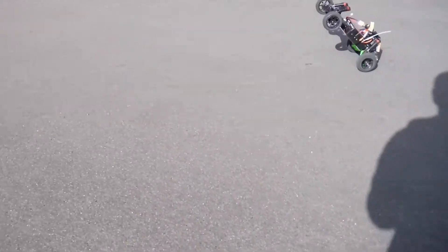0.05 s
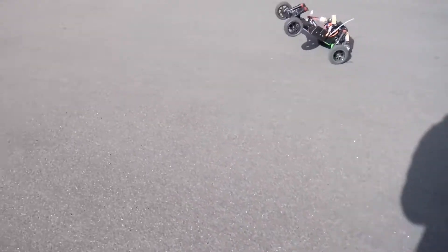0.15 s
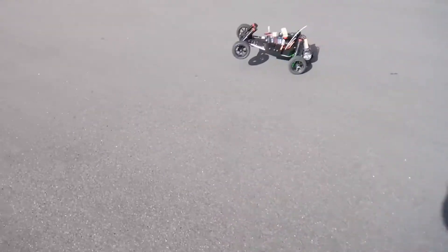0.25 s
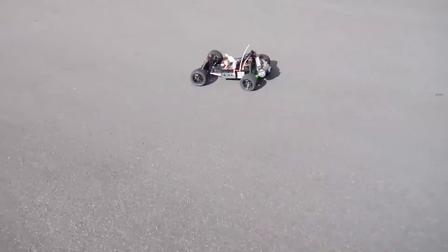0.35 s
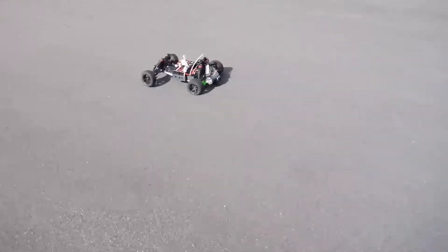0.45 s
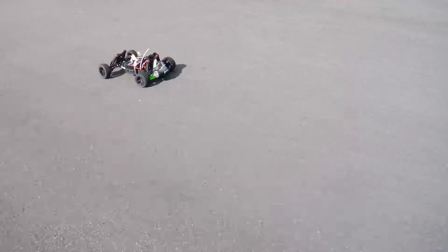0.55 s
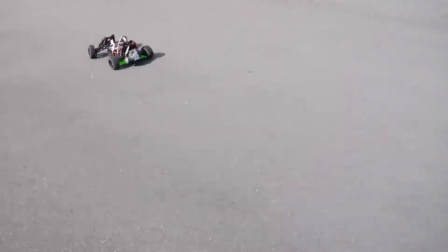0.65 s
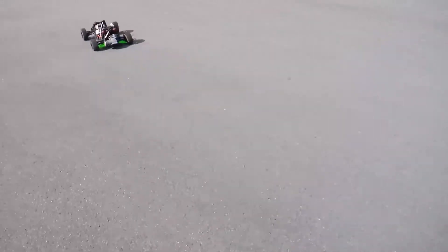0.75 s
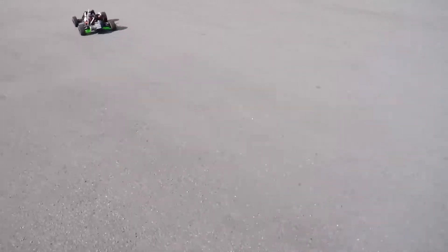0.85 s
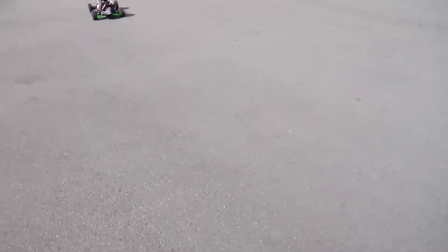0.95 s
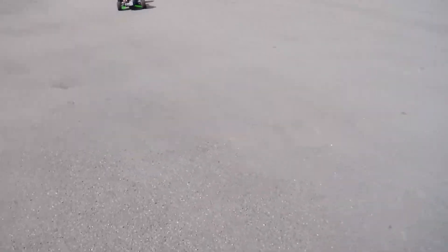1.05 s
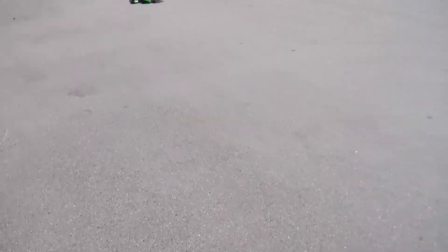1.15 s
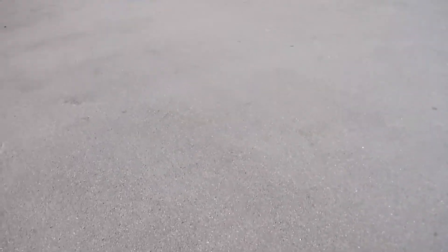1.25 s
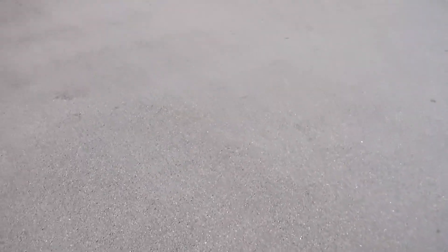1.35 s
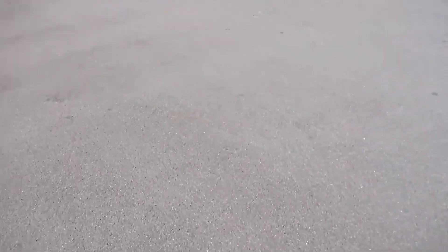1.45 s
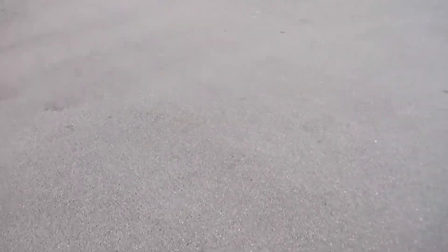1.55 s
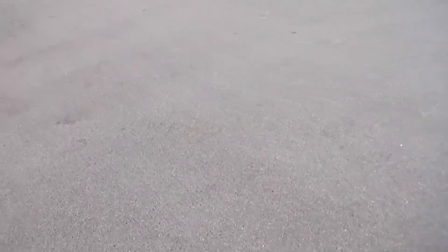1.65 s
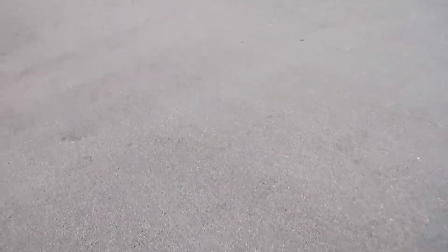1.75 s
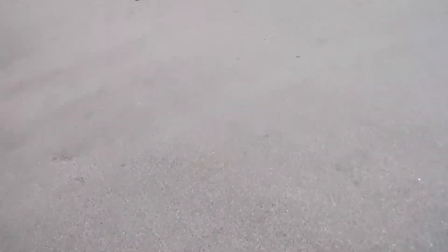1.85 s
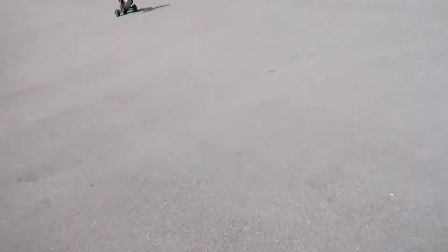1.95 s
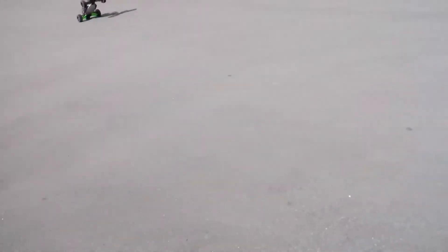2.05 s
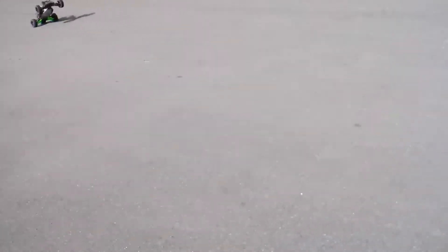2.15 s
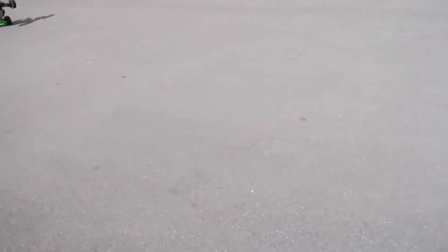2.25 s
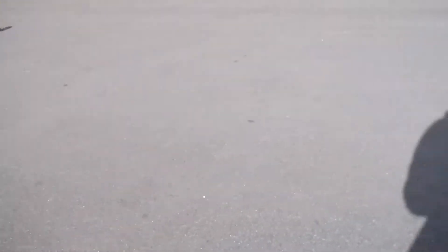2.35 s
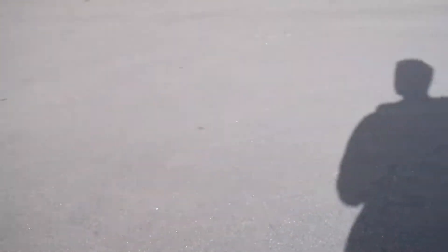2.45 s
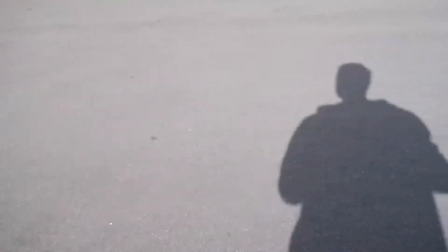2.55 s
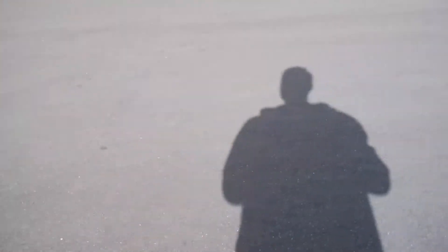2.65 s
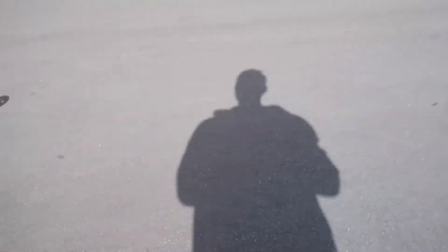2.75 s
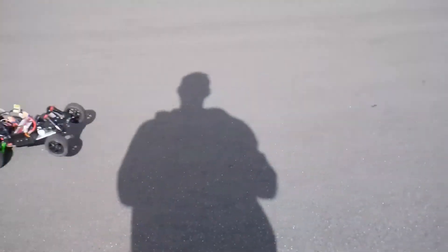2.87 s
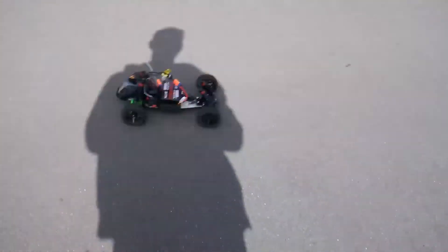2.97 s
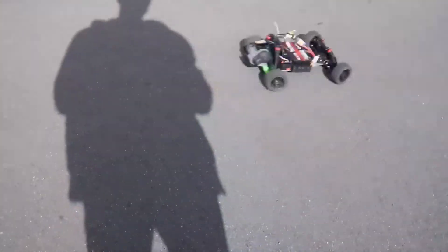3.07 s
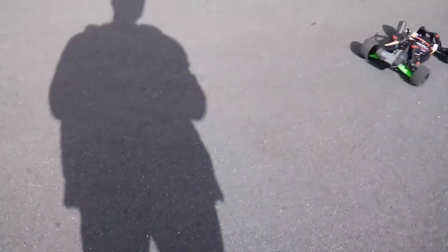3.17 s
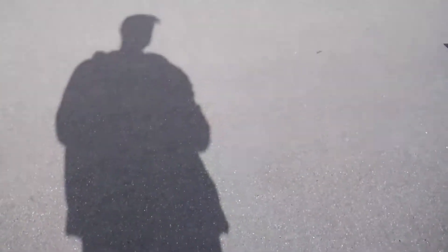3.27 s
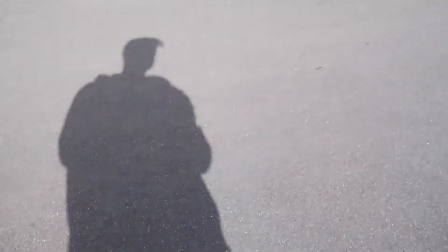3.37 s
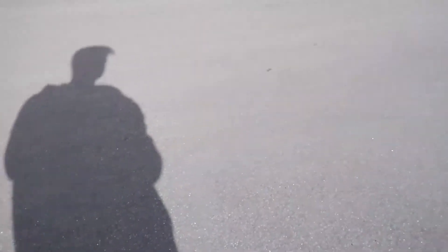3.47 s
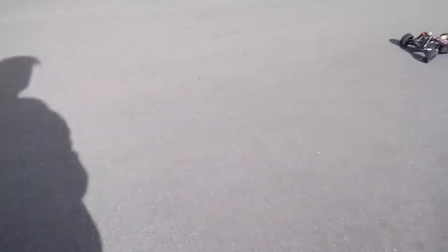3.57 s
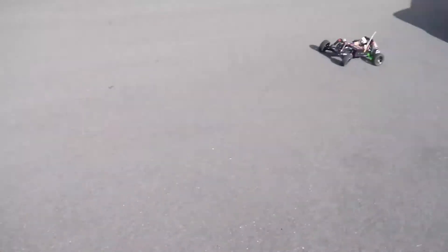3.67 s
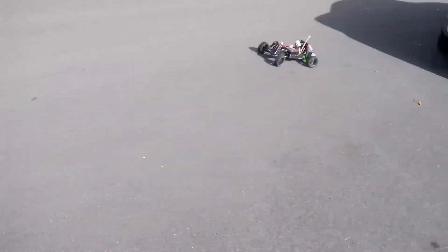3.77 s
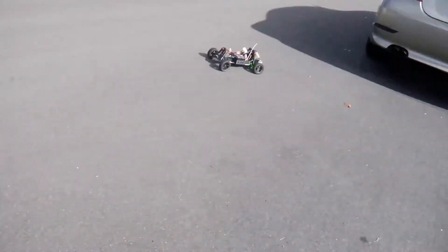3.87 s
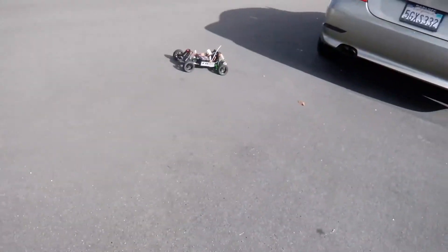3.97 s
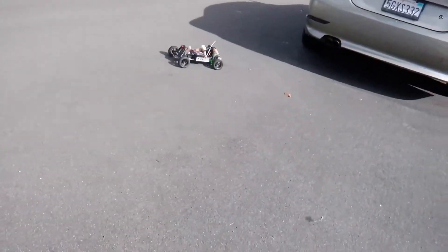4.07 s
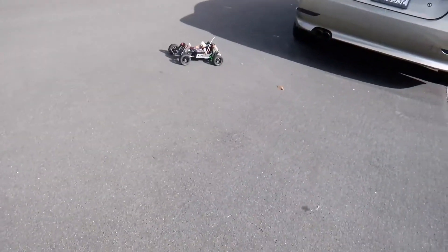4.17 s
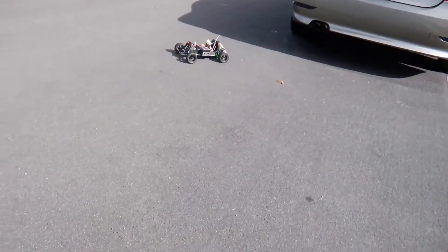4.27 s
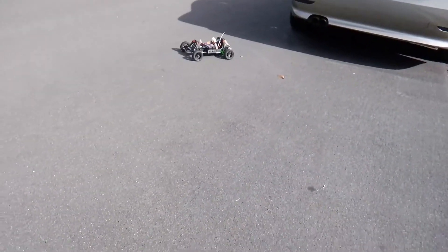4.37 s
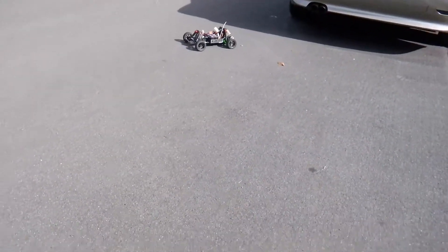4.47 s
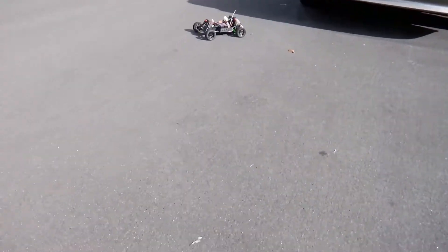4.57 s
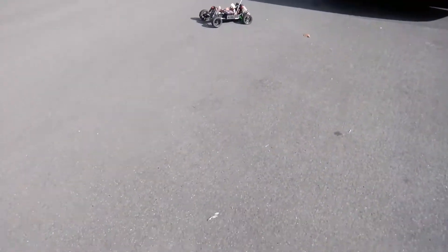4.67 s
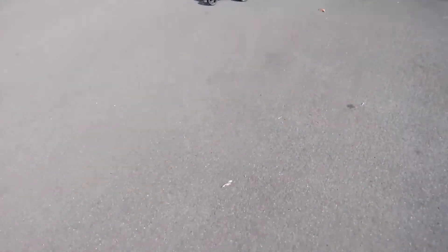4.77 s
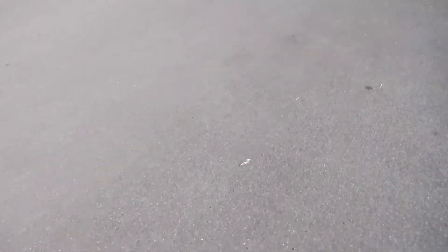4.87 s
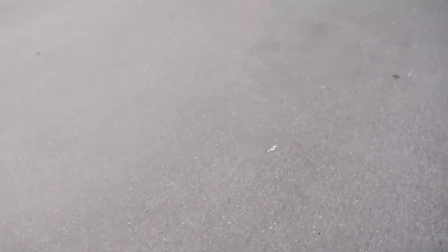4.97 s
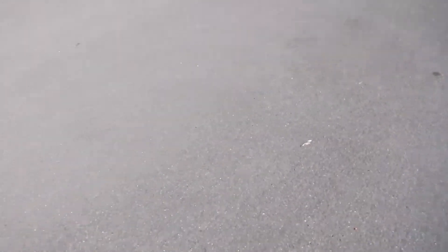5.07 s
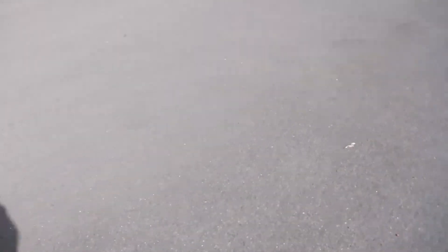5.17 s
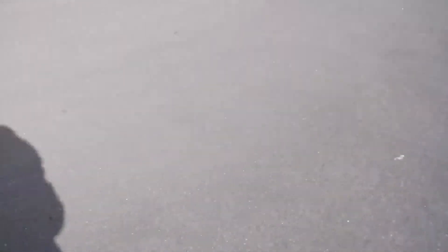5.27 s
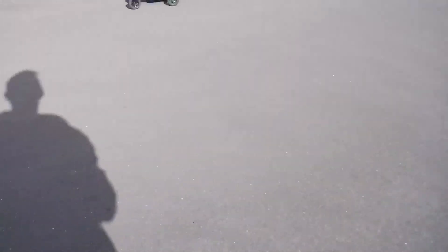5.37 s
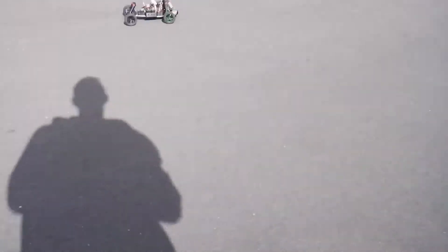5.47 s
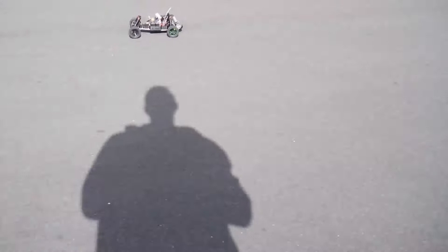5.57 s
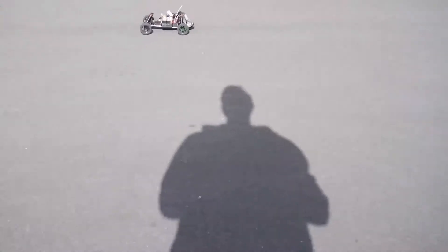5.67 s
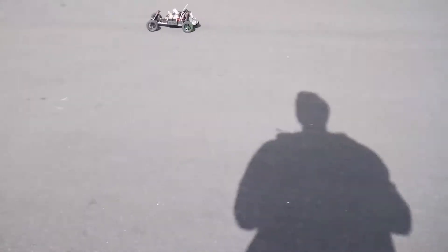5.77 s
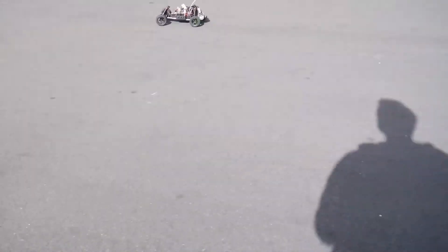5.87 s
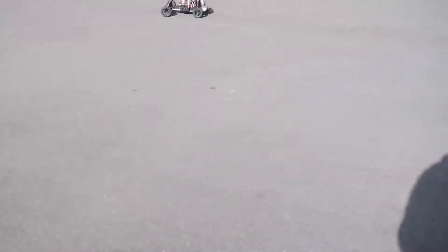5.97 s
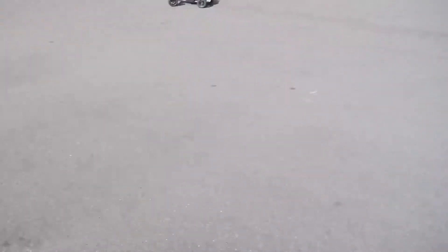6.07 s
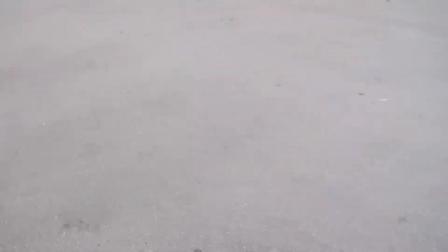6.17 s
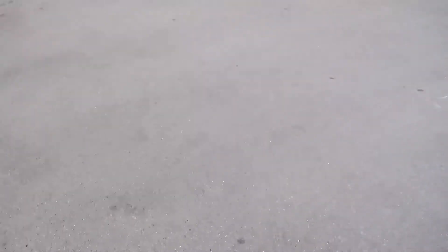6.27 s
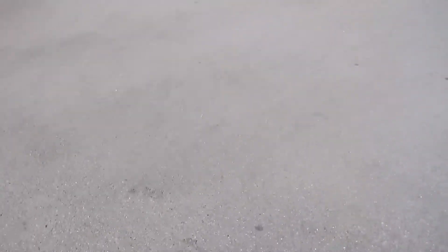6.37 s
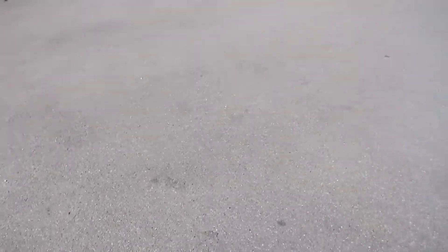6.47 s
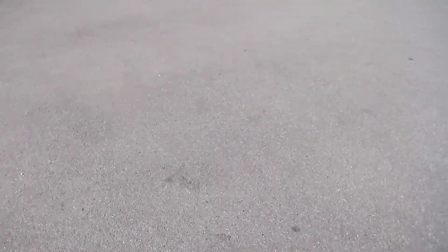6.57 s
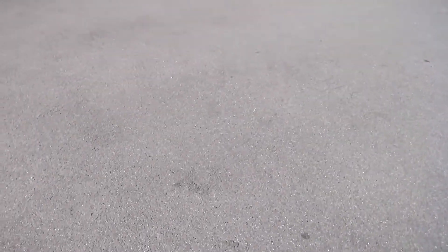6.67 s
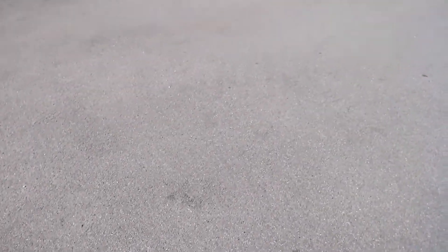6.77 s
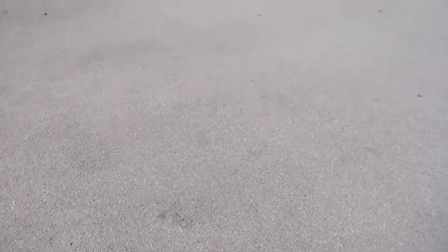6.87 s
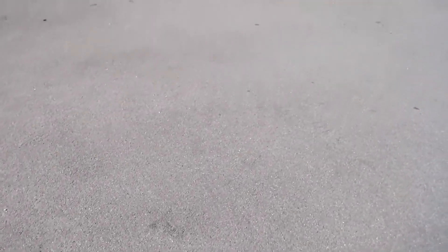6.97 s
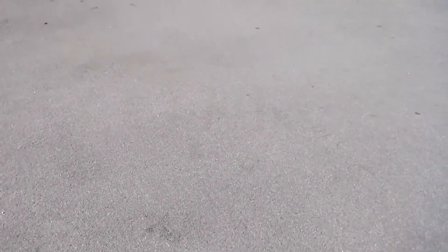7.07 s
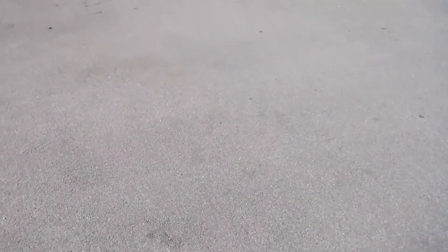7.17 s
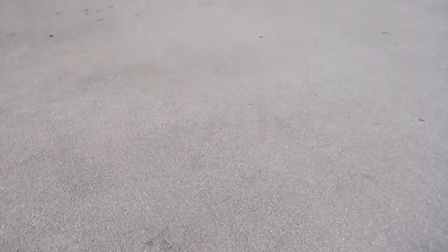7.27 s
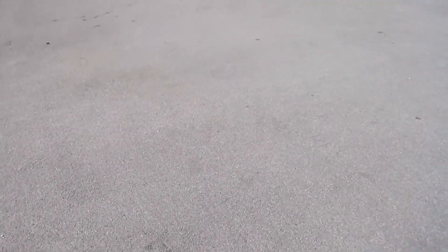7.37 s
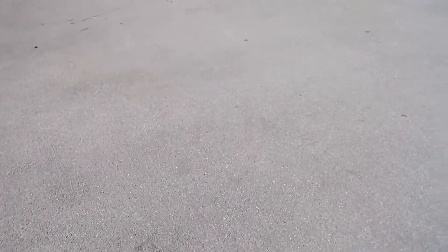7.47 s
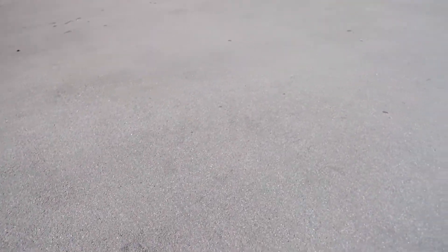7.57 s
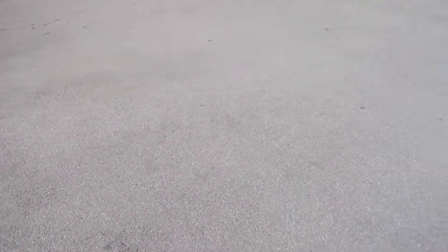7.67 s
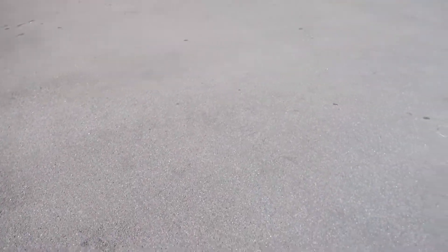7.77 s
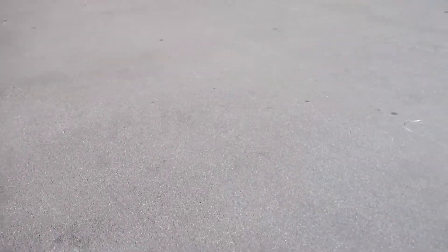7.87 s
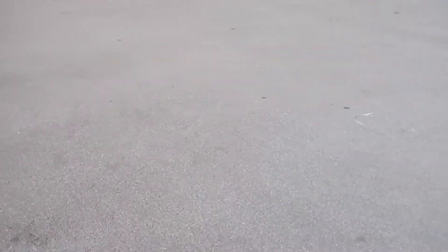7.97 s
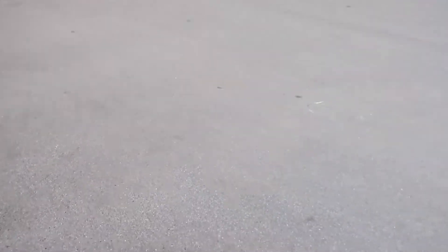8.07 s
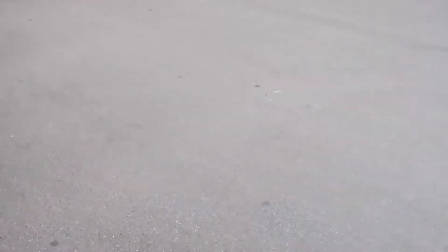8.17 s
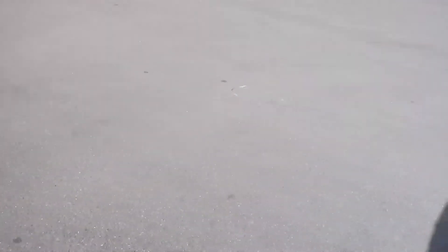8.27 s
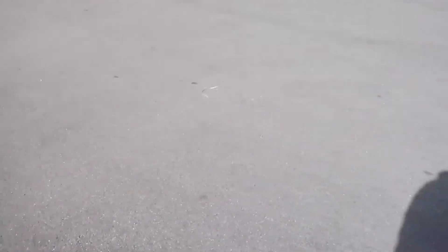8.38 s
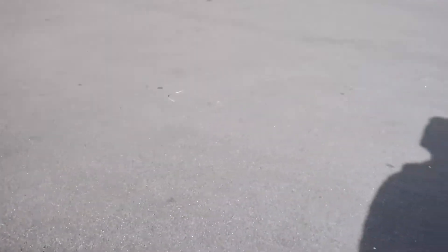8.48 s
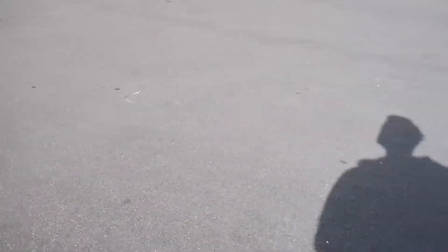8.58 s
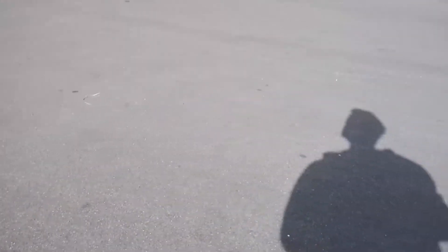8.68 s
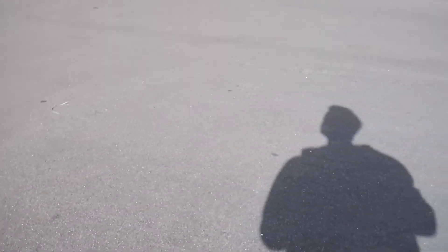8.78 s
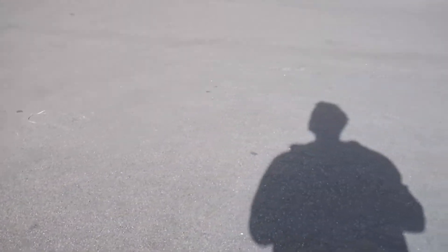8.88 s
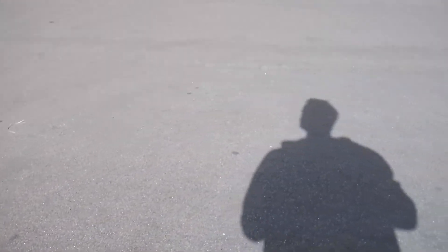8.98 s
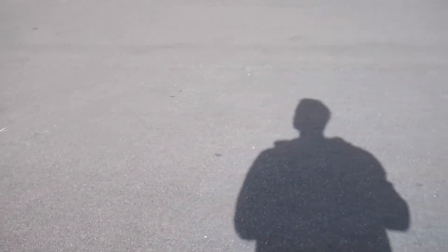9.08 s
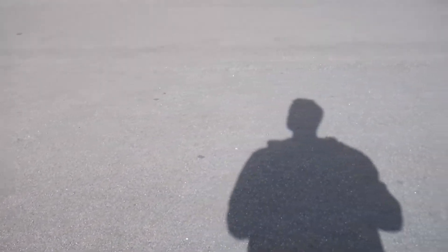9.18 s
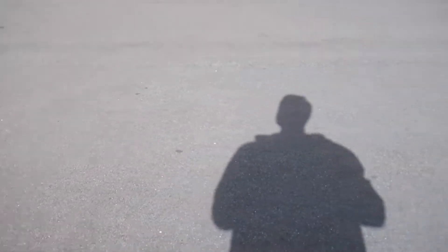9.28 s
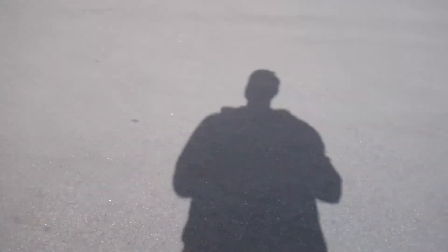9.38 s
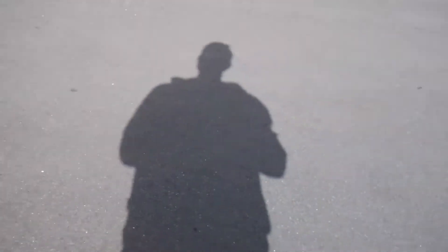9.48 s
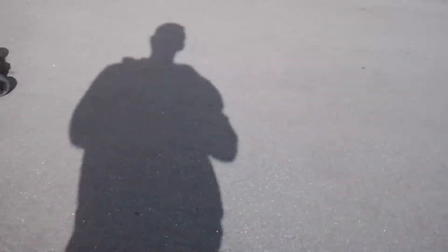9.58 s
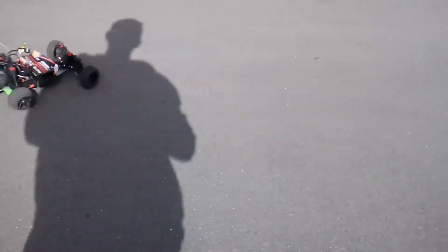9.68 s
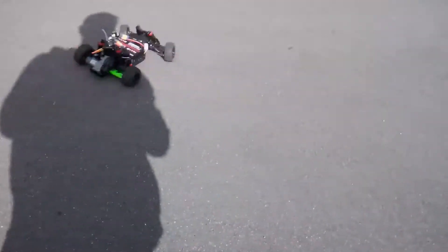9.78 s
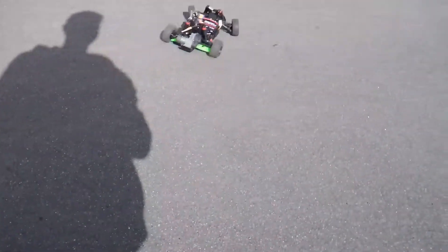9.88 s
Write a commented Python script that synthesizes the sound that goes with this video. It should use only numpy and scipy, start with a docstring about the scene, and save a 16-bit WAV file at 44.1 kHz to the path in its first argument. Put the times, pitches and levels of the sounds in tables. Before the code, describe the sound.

On a quiet street, the gears of a small radio-controlled car whine in uneven, high-pitched bursts over a plastic and metal rattle. The car knocks against the asphalt several times, eases to a crawl, then sprints up to a shrill peak and brakes. After some brief spin-ups, a longer climb in speed finishes near the microphone. Tyre noise swells as it passes and turns, while gusts add low rumbles and thumps.

```python
"""The gears of a small electric radio-controlled buggy whine as it sprints, coasts and tumbles on asphalt.
Each mesh radiates at its tooth-passing frequency, modulated by the eccentric spur gear. Impacts in the
drivetrain rattle the chassis, the tyres roar as it passes, and the frame knocks on the road.
The speed controller sings faintly, gusts buffet the microphone, and the quiet street adds a short echo."""
import sys
import numpy as np
from scipy import signal
from scipy.fft import rfft, irfft
from scipy.io import wavfile
from scipy.ndimage import uniform_filter1d

SR = 44100
rng = np.random.default_rng(int(sys.argv[2]) if len(sys.argv) > 2 else 0)


def dump_mix(stems):
    """Bounce the given channels to the path in sys.argv[1] as a 16-bit WAV at rate SR."""
    frames = np.atleast_2d(stems).T  # one column per channel
    limited = np.clip(frames, -1, 1)  # hard clip at full scale
    pcm = np.round(limited * 32767).astype(np.int16)
    wavfile.write(sys.argv[1], SR, pcm)


N = 437913

# Levels in the tables are relative: each source applies its own gain.
# Runs under throttle: t/s, spur mesh f/Hz, whine level/dB
WHEELIE_RUN = [(0.0, 9560, -42.5), (.15, 9470, -41), (.25, 3403, -27), (.28, 2779, -45),
               (.303, 2907, -19.5), (.335, 3230, -62), (.37, 5135, -26.5), (.46, 6635, -18.5),
               (.5, 4550, -44), (.56, 4970, -40), (.64, 6650, -29.5), (.75, 7570, -28.5),
               (.82, 6186, -38.5), (1.2, 6644, -55), (1.26, 5190, -62), (1.29, 3114, -23.5)]
BOUNCING_RUN = [(1.725, 3157, -25.5), (1.749, 3990, -36.5), (1.775, 3220, -27), (1.825, 3130, -29.5),
                (1.91, 3450, -27), (1.95, 4438, -62), (2.001, 6075, -34), (2.101, 7090, -50),
                (2.191, 4746, -26.5), (2.31, 7160, -40), (2.428, 5480, -35), (2.501, 6570, -31),
                (2.666, 6090, -44), (2.735, 7070, -28), (2.766, 5874, -31), (2.8, 6780, -23),
                (2.908, 6860, -30.5), (2.97, 6050, -40), (2.996, 4470, -24.5)]   # on the rear wheels
SPRINT_RUN = [(4.641, 2424, -22.5), (4.689, 2403, -30), (4.76, 2710, -25), (4.785, 3162, -28),
              (4.825, 4036, -31), (4.85, 3446, -28.5), (4.88, 3917, -31), (4.97, 3970, -31),
              (5.25, 4984, -30.5), (5.3, 5590, -25.5), (5.7, 6090, -24.5), (5.751, 6500, -22),
              (5.97, 6830, -34), (6.08, 9210, -30), (6.19, 9550, -33), (6.281, 6230, -48),
              (6.304, 3573, -31.5)]
LUNGE_RUN = [(6.773, 3221, -33), (6.885, 3764, -30)]
RETURN_RUN = [(7.705, 3210, -26), (7.78, 2987, -33.5), (7.83, 3957, -27.5), (7.915, 4533, -31.5),
              (8.0, 3400, -31.5), (8.08, 3420, -33), (8.15, 3913, -31.5), (8.3, 4290, -30.5),
              (8.5, 4460, -32), (8.849, 5058, -37.5), (9.25, 5260, -32), (9.4, 5837, -33.5),
              (9.719, 5450, -29), (9.764, 6600, -18), (9.849, 8780, -26), (9.93, 9110, -29)]   # slow build-up, then a kick close by
# Peaks of brief spin-ups between runs: t/s, spur mesh f/Hz, whine level/dB
BLIPS = [(3.465, 4230, -30), (3.734, 1983, -41), (3.82, 1900, -35), (3.993, 2300, -35.5),
         (4.105, 1700, -38), (4.264, 1700, -39), (6.996, 2597, -36), (7.075, 2622, -40.5),
         (7.21, 2710, -42.5), (7.33, 1750, -34), (7.451, 2723, -45)]
# Strength of each mesh against speed: spur mesh f/Hz, level/dB
SPUR_RESPONSE = [(500, -37), (900, -34), (1300, -1.5), (3100, 5.5), (3600, 1), (4000, 5.5), (5100, -6),
                 (5700, -4.5), (6600, 1), (7000, -2.5), (8000, -24), (9500, -18)]
GEARBOX_RESPONSE = [(3000, -14), (3900, -11), (5000, -8.5), (6200, -3), (7000, -1.5), (9200, 0.5)]
# Radiation of overtones from the gear case: f/Hz, level/dB
SPUR_RADIATION = [(400, -14), (2500, 1), (4200, 3), (5500, -9), (6900, 6), (7600, -24), (8500, -38),
                  (10000, -8), (12000, -26), (14000, -51), (16000, -42)]
GEARBOX_RADIATION = [(1000, -8), (2400, -2), (3150, 2), (3700, -3), (4000, -6), (4350, -17), (7000, -24)]
# Chassis noise, one curve per stretch of driving: t/s, rattle level/dB, rasp level/dB
CHASSIS_LEVELS = [
    [(0.0, -19, -43.5), (0.012, -29.5, -29.5), (0.238, -25, -32), (0.288, -38.5, -51), (0.446, -25, -26.5),
     (0.54, -49, -51), (0.64, -28.5, -33), (0.852, -34, -37), (1.28, -28, -38), (1.62, -43.5, -49.5)],
    [(1.63, -38, -52), (1.668, -29.5, -43), (1.726, -24, -35), (1.732, -30, -37), (1.868, -32, -50),
     (1.944, -35.5, -44), (2.162, -24.5, -34), (2.626, -35.5, -36.5), (2.656, -36, -36), (2.68, -53, -46)],
    [(2.69, -45, -54), (2.734, -33, -43), (2.866, -35, -35), (2.972, -32, -46), (2.996, -24, -28),
     (3.004, -22.5, -31), (3.118, -34, -36), (3.478, -25, -33), (3.718, -39.5, -52), (3.78, -55, -58)],
    [(4.58, -58, -62), (4.608, -25, -44), (4.648, -25, -35.5), (4.964, -27.5, -43.5), (5.112, -27, -36.5),
     (5.826, -28, -34), (6.152, -22, -33.5), (6.284, -36, -42), (6.304, -25.5, -37), (6.35, -59, -53)],
    [(6.36, -48, -49), (6.38, -39, -43.5), (6.716, -44, -47), (6.726, -29, -44), (6.762, -34, -36),
     (6.772, -25, -32), (6.784, -28, -38), (6.866, -25, -29.5), (6.914, -23.5, -43), (6.95, -54, -54)],
    [(7.61, -73, -79), (7.62, -36, -58), (7.69, -28.5, -41.5), (8.25, -32.5, -45.5), (8.39, -32.5, -42.5),
     (8.93, -30, -45), (9.74, -27.5, -27), (9.76, -30, -30), (9.81, -26.5, -33), (9.93, -25.5, -27.5)],
]
# Modes of the frame: f/Hz, bandwidth/Hz, level/dB
FRAME_MODES = [(886, 76, 3.5), (1568, 107, 6.5), (2000, 54, 3), (2377, 200, 0.5), (3223, 147, 8.5),
               (3995, 104, 3)]
# Impacts on the road: t/s, level/dB
KNOCKS = [(0.3494, -35), (1.652, -21), (1.7752, -17), (1.9531, -12), (2.2544, -8.5), (2.3072, -6.5),
          (2.4006, -5.5), (2.4492, -6.5), (2.4931, -6), (2.534, -5.5), (2.5884, -14), (2.6414, -7),
          (2.6545, -7.5), (2.952, -13), (2.9796, -31.5), (4.6063, -12), (5.9754, -15), (6.244, -12),
          (6.306, -26), (6.6567, -16), (7.2148, -21.5), (7.2729, -28), (7.308, -20.5), (7.442, -22.5),
          (7.6243, -20)]
# Swells of noise: centre t/s, duration/s, level/dB
TYRE_SWELLS = [(.22, .08, -41), (.43, 0.081, -28.5), (.74, 0.17, -32.5), (1.37, 0.4, -25.5),
               (3.29, .5, -23), (4.67, 0.11, -29.5), (6.1, 0.39, -26), (6.61, .3, -28.5), (9.62, 0.34, -20)]   # passes, turns and scuffs under sudden throttle
GUSTS = [(.15, 0.71, -38.5), (.38, 0.22, -32), (.78, 0.26, -34), (1.1, 0.68, -37.5), (1.65, 0.082, -29.5),
         (1.79, 0.036, -31), (2.95, 0.078, -29.5), (3.26, 0.042, -38), (4.1, 1.17, -48), (5.02, 0.094, -37),
         (5.59, 0.26, -21.5), (6.0, .16, -30.5), (6.24, 0.075, -32), (7.04, 0.051, -32), (7.4, 1.02, -45.5),
         (8.04, .1, -33), (8.59, 0.11, -28.5), (8.79, 0.16, -27), (9.27, .45, -23), (9.75, 0.12, -34)]
# Single vortices at the microphone: t/s, level/dB, f/Hz
EDDIES = [(0.384, -16, 124), (0.654, -18.5, 102), (0.671, -15.5, 132), (0.719, -18, 158.3),
          (1.067, -17.5, 123), (1.674, -18.5, 121.3), (2.957, -14, 90), (5.014, -23, 130),
          (5.456, -11, 183.8), (5.484, -7.5, 177.6), (5.511, -14, 155.9), (5.539, -15, 126.7),
          (5.626, -12, 130), (5.689, -13.5, 197.8), (6.244, -16.5, 315.2), (7.035, -27, 166.6),
          (7.13, -25, 102.1), (7.21, -26, 89), (7.305, -15, 152.3), (7.536, -26.5, 85), (7.697, -18, 97.5),
          (7.825, -20.5, 91.66), (8.05, -21.5, 105.8), (8.599, -15.5, 118.1), (9.093, -12, 269.9),
          (9.726, -23.5, 126.7)]
# Spectral density of each noise: f/Hz, level/dB
RATTLE_SPECTRUM = [(120, -27.5), (250, -5.5), (450, -9), (780, 8.5), (1150, -17), (1600, -1.5), (2050, 0.5),
                   (2500, -2.5), (3200, 9), (3650, -6), (4000, -1.5), (4600, -21.5), (7000, -50.5)]
RASP_SPECTRUM = [(3000, -1), (4400, 5.5), (5200, 3.5), (6500, 8), (7000, 1.5), (7500, -8.5), (8400, -14),
                 (9500, -26.5), (12000, -50), (16000, -77)]
KNOCK_SPECTRUM = [(200, -14), (800, -28), (1200, 2.5), (1750, 14.5), (2400, 4), (3100, 12), (4600, -4),
                  (6700, -5.5), (7800, -15.5), (15000, -46)]
TYRE_SPECTRUM = [(100, -27), (300, -7), (500, -6), (760, 3.5), (1080, -1.5), (1350, -7), (2000, -14.5),
                 (4000, -16.5), (9000, -50)]
WIND_SPECTRUM = [(20, -5), (45, -5.5), (80, -0.5), (135, -2.5), (230, -8), (350, -14), (600, -32),
                 (1500, -73), (5000, -104)]
PUFF_SPECTRUM = [(100, -12), (350, -2), (700, -14), (1300, -14), (3000, -54), (8000, -80)]
STREET_SPECTRUM = [(25, -4), (150, 0), (400, -12.5), (900, -12), (2000, -15.5), (4000, -23), (7000, -34),
                   (11000, -35.5), (16000, -46)]

SPUR_TEETH, GEARBOX_TEETH = 90, 22
TIME = np.arange(N) / SR


def gears(turns, mesh_hz, whine_db, rattle_db, slack):
    """Forced vibration: two meshes drive the gear cover, which rings as a tone crosses its resonance."""
    spur = from_db(whine_db - 4) * spur_mesh(turns, mesh_hz, slack)
    gearbox = from_db(rattle_db - 4.5) * gearbox_mesh(turns, mesh_hz, slack)
    whine = spur + gearbox
    return whine + from_db(-6) * resonator(whine, hz=3160, width_hz=260)


def spur_mesh(turns, mesh_hz, slack):
    """Periodic tooth contact gives a tone and its octave; intermodulation of the meshes adds a sum tone."""
    speed = np.minimum(mesh_hz / 6500, 1)
    bite = throb(turns, once_db=5.5 * speed, twice_db=2 * speed)
    eccentric_turns = turns + 0.0016 * np.sin(2 * np.pi * turns)
    backlash = 0.66 - 0.71 * speed + 0.77 * slack   # slow or unloaded teeth chatter in their play
    fundamental = mesh_tone(eccentric_turns, SPUR_TEETH, jitter_rad=0.68, rough=backlash)
    octave = from_db(-9) * mesh_tone(eccentric_turns, 2 * SPUR_TEETH, jitter_rad=1.2, rough=0.47)
    sum_teeth = SPUR_TEETH + GEARBOX_TEETH
    sum_tone = from_db(-21) * mesh_tone(turns, sum_teeth, jitter_rad=0.56, rough=0.55)
    sum_tone *= gain_at(SPUR_RADIATION, sum_teeth * mesh_hz / SPUR_TEETH)
    octave *= throb(turns, once_db=4.5, twice_db=-10) * gain_at(SPUR_RADIATION, 2 * mesh_hz)
    return gain_at(SPUR_RESPONSE, mesh_hz) * (bite * fundamental + speed * octave + sum_tone)


def gearbox_mesh(turns, mesh_hz, slack):
    """Harmonics of the small pinion on the spur shaft; the overtones swell at the case resonance."""
    gearbox_hz = GEARBOX_TEETH * mesh_hz / SPUR_TEETH
    chatter = 0.77 * slack
    first = mesh_tone(turns, GEARBOX_TEETH, jitter_rad=0.5, rough=0.15 + chatter)
    second = mesh_tone(turns, 2 * GEARBOX_TEETH, jitter_rad=1.0, rough=0.066 + chatter)
    second *= from_db(-3) * gain_at(GEARBOX_RADIATION, 2 * gearbox_hz)
    third = mesh_tone(turns, 3 * GEARBOX_TEETH, jitter_rad=0.24, rough=0.18 + chatter)
    third *= gain_at(GEARBOX_RADIATION, 3 * gearbox_hz) ** 2
    overtones = throb(turns, once_db=3.5, twice_db=1) * (second + third)
    return gain_at(GEARBOX_RESPONSE, mesh_hz) * (first + overtones)


def mesh_tone(turns, teeth, jitter_rad, rough):
    """Random modulation: bumps shake a tone's phase; uneven teeth spread its power into sidebands."""
    phase = 2 * np.pi * teeth * turns + jitter_rad * drift(65)
    sidebands = drift(330) * np.sin(phase) + drift(330) * np.cos(phase)
    tone = np.sin(phase) * flutter(spread_db=2, rate_hz=60)
    share = np.clip(rough, 0, 1)
    return np.sqrt(2 * (1 - share)) * tone + np.sqrt(share) * sidebands


def throb(turns, once_db, twice_db):
    """Amplitude modulation: the spur gear runs out of true and bites harder once and twice a turn."""
    angle = 2 * np.pi * turns
    depth_db = once_db * np.cos(angle) + twice_db * np.cos(2 * angle) * (1 + 0.5 * drift(0.77))
    return unit_rms(from_db(depth_db))


def motor():
    """Mesh frequency and whine level under uniform acceleration: runs end by braking, blips freewheel."""
    launch_hz_per_s, brake_hz_per_s, freewheel_hz_per_s = 32000, 66000, 25000
    crawl_hz, crawl_db, fade_db_per_s = 496, -28, 160
    runs = [(run, brake_hz_per_s) for run in (WHEELIE_RUN, BOUNCING_RUN, SPRINT_RUN, LUNGE_RUN, RETURN_RUN)]
    blips = [([blip], freewheel_hz_per_s) for blip in BLIPS]
    mesh_hz, whine_db = np.full(N, crawl_hz), np.full(N, crawl_db)
    for rows, stop_hz_per_s in runs + blips:
        hz, db = in_time(rows)
        before_s = np.maximum(rows[0][0] - TIME, 0)
        after_s = np.maximum(TIME - rows[-1][0], 0)
        hz = hz - launch_hz_per_s * before_s - stop_hz_per_s * after_s
        whine_db = np.where(hz > mesh_hz, db - fade_db_per_s * after_s, whine_db)   # the fastest curve leads
        mesh_hz = np.maximum(hz, mesh_hz)
    return uniform_filter1d(mesh_hz, size=400), uniform_filter1d(whine_db, size=400)


def shaft_turns(mesh_hz):
    """Rotation is the integral of speed, which wavers on bumps, most while the wheels seek grip."""
    waver = 0.004 + 0.02 / (1 + (mesh_hz / 3300) ** 4)
    return np.cumsum(mesh_hz * (1 + waver * drift(18.12))) / SR / SPUR_TEETH


def chassis(turns, mesh_hz, rattle_db, rasp_db):
    """Impact noise: loose joints tick at a crawl; at speed a dense clatter pulses with the spur gear."""
    hits_per_s = 1500 + 0.6 * mesh_hz
    jolts = flutter(spread_db=1.5, rate_hz=26.6)
    crawl_share = 1 / (1 + (mesh_hz / 3400) ** 2)
    ticks = unit_rms(frame_ring(grains(900, spread_db=2.5)))
    clatter_hits = grains(hits_per_s, spread_db=0.5) * throb(turns, once_db=2, twice_db=-0.6)
    clatter = colour(clatter_hits, RATTLE_SPECTRUM)
    rattle = np.sqrt(crawl_share) * ticks + np.sqrt(1 - crawl_share) * clatter
    rasp_hits = grains(hits_per_s, spread_db=2) * throb(turns, once_db=3.2, twice_db=1.2)
    rasp = colour(rasp_hits, RASP_SPECTRUM)
    return jolts * (from_db(rattle_db - 4.5) * rattle + from_db(rasp_db - 3.5) * rasp)


def chassis_levels():
    """Rattle and rasp levels; each blip shakes the chassis and adds to the rattle in power."""
    rattle_db, rasp_db = in_time(np.vstack(CHASSIS_LEVELS))
    shake_s = 0.059
    shakes = swells([(s, shake_s, db - 0.5) for s, _, db in BLIPS])
    return 20 * np.log10(np.hypot(from_db(rattle_db), shakes)), rasp_db


def frame_ring(force):
    """Modal superposition: the frame responds as parallel resonators of alternating sign."""
    return sum((-1) ** k * from_db(db) * resonator(force, hz, width_hz)
               for k, (hz, width_hz, db) in enumerate(FRAME_MODES))


def knocks():
    """Impulsive excitation: plastic and metal strike the road with a crunch that rings the frame."""
    crunch = noise_bursts(KNOCKS, decay_s=0.003)
    return from_db(-9.5) * colour(crunch, KNOCK_SPECTRUM) + from_db(-29) * frame_ring(crunch)


def tyres(mesh_hz):
    """Tread impacts on asphalt grow as a power of speed; air pumping sings in passes and turns."""
    passes = swells(TYRE_SWELLS)
    rolling = from_db(-41.5) * (mesh_hz / 6070) ** 0.94
    tread_band = signal.butter(2, [893, 1213], "band", fs=SR, output="sos")
    pumping = unit_rms(signal.sosfilt(tread_band, grains(5000, spread_db=4)))
    slaps = colour(grains(5000, spread_db=4), TYRE_SPECTRUM)
    roar = np.hypot(rolling, passes) * slaps + from_db(-8.5) * passes * pumping
    return from_db(-3.2 + 2.4 * drift(22)) * roar


def electronics(mesh_hz, slack):
    """Two faint phase-modulated tones: the speed controller under throttle, and a steady whistle."""
    controller_hz, whistle_hz = 8120, 10072
    throttle = np.clip((mesh_hz - 3000) / 3000, 0, 1) * (1 - slack)
    controller_gain = from_db(-65 + 3 * drift(1.2)) * throttle
    controller = np.sin(2 * np.pi * controller_hz * TIME + 2 * drift(13))
    whistle = np.sin(2 * np.pi * whistle_hz * TIME + 2.4 * drift(50))
    return controller_gain * controller + from_db(-71.5) * whistle


def wind():
    """Turbulent pressure rumbles and thumps on the microphone port, which sheds the deepest bass."""
    breeze = from_db(-59.5)
    strength = np.hypot(breeze, swells(GUSTS)) * flutter(spread_db=4.6, rate_hz=34.4)
    rumble = from_db(2) * strength * colour(rng.standard_normal(N), WIND_SPECTRUM)
    # each wind thump begins with a short puff of noise
    bursts = noise_bursts([(s, db) for s, db, _ in EDDIES], decay_s=0.0034)
    onset_puffs = from_db(-11) * colour(bursts, PUFF_SPECTRUM)
    bass_cut = signal.butter(1, 50, "high", fs=SR, output="sos")
    return signal.sosfilt(bass_cut, rumble + eddies(delay_s=0.00496) + onset_puffs)


def eddies(delay_s):
    """A passing vortex gives one pressure cycle, suction then push, shorter for a small vortex."""
    reach = SR // 30
    t = np.arange(-reach, reach) / SR
    pressure = np.zeros(N)
    for s, db, hz in EDDIES:
        phase = 2 * np.pi * hz * (t - delay_s)
        start = int(s * SR) - reach
        pressure[start:start + len(t)] += from_db(db) * phase * np.exp((1 - phase ** 2) / 2)
    return pressure


def street_echoes(direct, level_db, decay_s):
    """Scattering from parked cars and house fronts adds a weak, short tail to the direct sound."""
    t = np.arange(SR // 2) / SR
    scatter = rng.standard_normal(len(t)) * (rng.random(len(t)) < 0.02)
    scatter *= np.exp(-t / decay_s) * (t > 0.012)
    return direct + from_db(level_db) * signal.fftconvolve(direct, scatter / np.linalg.norm(scatter))[:N]


def quiet_street():
    """Stationary broadband noise, strongest in the bass."""
    return from_db(-47.5) * colour(rng.standard_normal(N), STREET_SPECTRUM)


def from_db(db):
    """Amplitude ratio of a level."""
    return 10 ** (np.asarray(db) / 20)


def unit_rms(x):
    """Normalisation to unit power."""
    return x / np.sqrt(np.mean(x ** 2) + 1e-20)


def in_time(rows):
    """Linear interpolation of each column after t/s to every sample."""
    s, *columns = np.transpose(rows)
    return [np.interp(TIME, s, column) for column in columns]


def gain_at(spectrum, hz):
    """Gain of a spectrum, interpolated in log frequency."""
    f, db = np.transpose(spectrum)
    return from_db(np.interp(np.log(np.maximum(hz, 1)), np.log(f), db))


def drift(rate_hz):
    """Low-pass Gaussian noise of unit power."""
    pole = np.exp(-2 * np.pi * rate_hz / SR)
    return unit_rms(signal.lfilter([1], [1, -2 * pole, pole * pole], rng.standard_normal(N + SR))[SR:])


def flutter(spread_db, rate_hz):
    """Log-normal gain fluctuation of unit power."""
    return unit_rms(from_db(spread_db * drift(rate_hz)))


def resonator(x, hz, width_hz):
    """Response of one damped mode."""
    return signal.lfilter(*signal.iirpeak(hz, hz / width_hz, fs=SR), x)


def colour(x, spectrum, size=4096):
    """Minimum-phase filtering by the folded cepstrum; white noise keeps its power."""
    cepstrum = irfft(np.log(gain_at(spectrum, np.arange(size // 2 + 1) * SR / size)))
    cepstrum[1:size // 2] *= 2
    cepstrum[size // 2 + 1:] = 0
    response = irfft(np.exp(rfft(cepstrum)))
    return signal.fftconvolve(x, response / np.linalg.norm(response))[:N]


def grains(per_s, spread_db):
    """Shot noise: random clicks of uneven size, with unit power at any rate."""
    sizes = from_db(spread_db * np.clip(rng.standard_normal(N), -2, 2)) * rng.choice([-1, 1], N)
    return unit_rms(sizes * (rng.random(N) < per_s / SR) / np.sqrt(per_s))


def noise_bursts(rows, decay_s):
    """Noise that jumps at each event and decays exponentially."""
    hits = np.zeros(N)
    for s, db in rows:
        hits[int(s * SR)] = from_db(db)
    envelope = signal.lfilter([1], [1, -np.exp(-1 / (decay_s * SR))], hits + 1e-18)
    return envelope * rng.standard_normal(N)


def swells(rows):
    """Gaussian envelopes added in power; each duration is the full width at half amplitude."""
    power = np.full(N, 1e-18)
    for s, duration_s, db in rows:
        offset = (TIME - s) / duration_s
        near = np.abs(offset) < 2
        power[near] += (from_db(db) * 0.5 ** ((2 * offset[near]) ** 2)) ** 2
    return np.sqrt(power)


def scene():
    """Superposition of the buggy, its echoes, the street and the wind in one channel."""
    mesh_hz, whine_db = motor()
    rattle_db, rasp_db = chassis_levels()
    turns = shaft_turns(mesh_hz)
    loaded_db, slack_range_db = -37.5, 6.5   # below loaded_db the teeth begin to lose contact
    slack = np.clip((loaded_db - whine_db) / slack_range_db, 0, 1)
    buggy = gears(turns, mesh_hz, whine_db, rattle_db, slack)
    buggy += chassis(turns, mesh_hz, rattle_db, rasp_db) + tyres(mesh_hz) + knocks()
    background = quiet_street()
    buggy = street_echoes(buggy, level_db=-16.5, decay_s=0.05)
    return (buggy + electronics(mesh_hz, slack) + background + wind())[None]


def record(dry):
    """Band limiting by a steep zero-phase low-pass filter."""
    cutoff_hz = 15700
    return signal.sosfiltfilt(signal.ellip(10, 0.05, 60, cutoff_hz, fs=SR, output="sos"), dry)


dry = scene()
out = record(dry)
dump_mix(out)
```